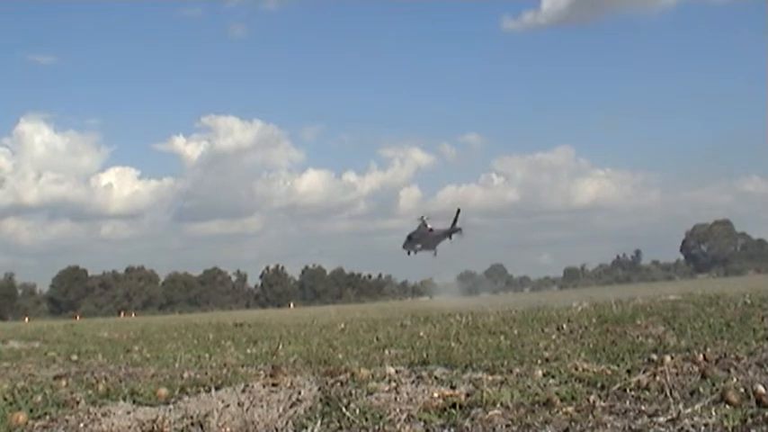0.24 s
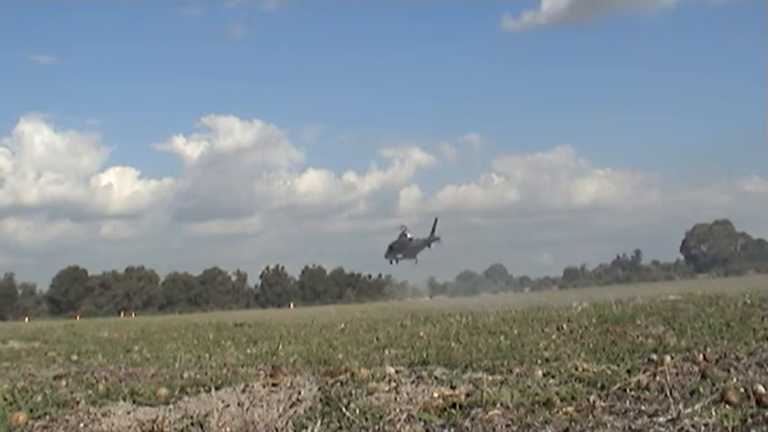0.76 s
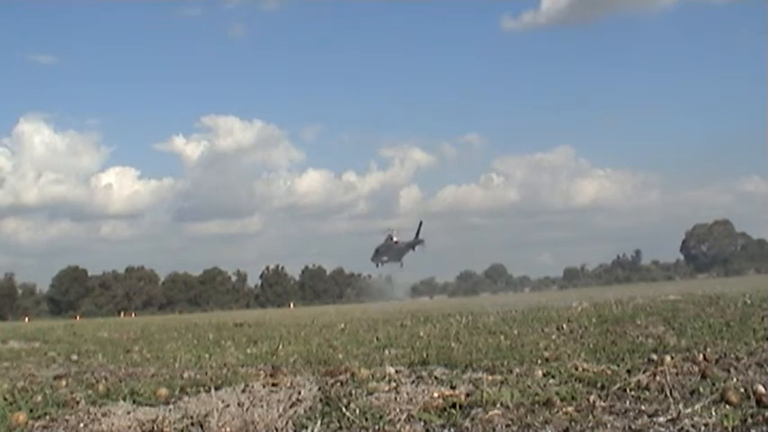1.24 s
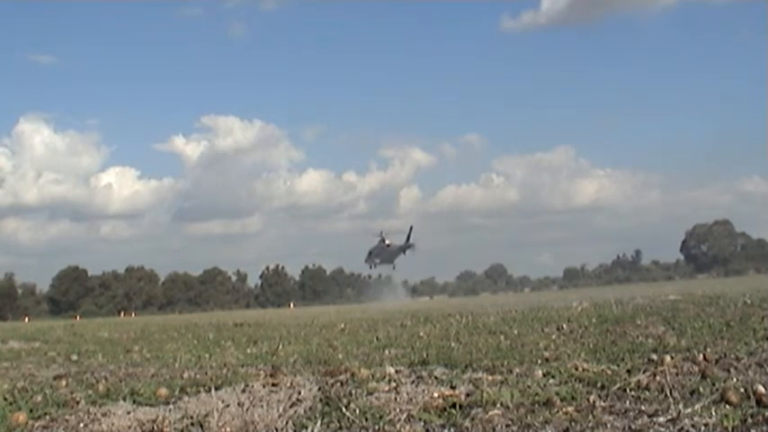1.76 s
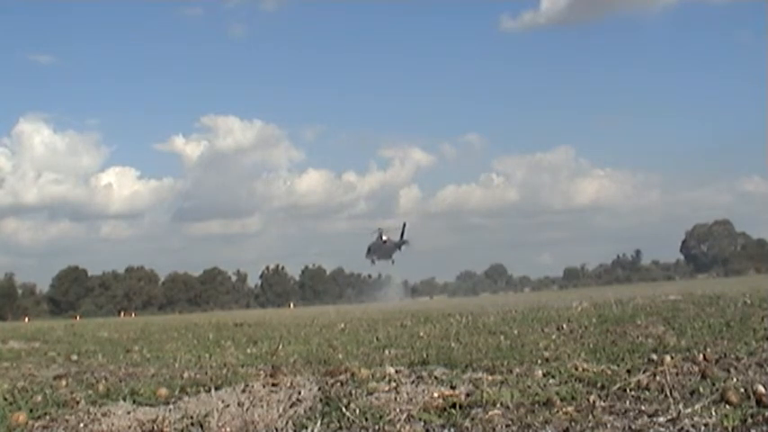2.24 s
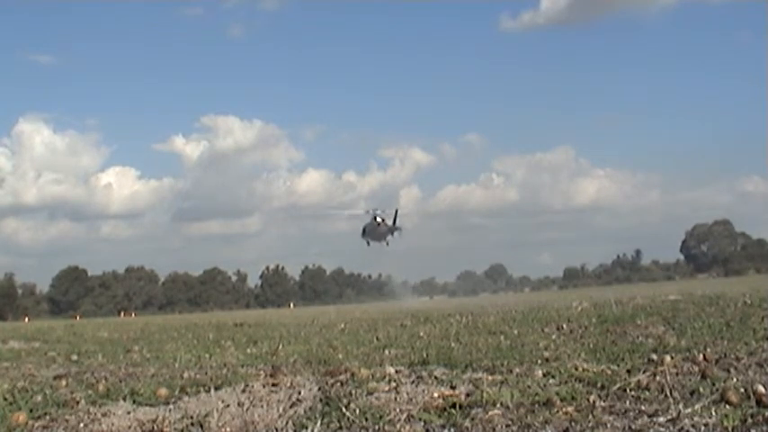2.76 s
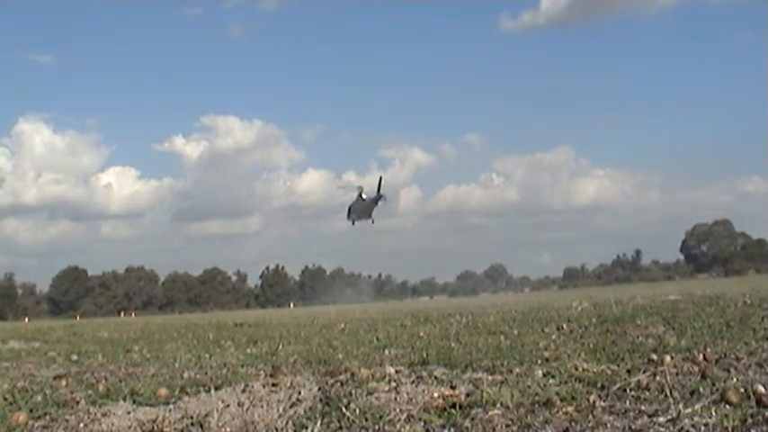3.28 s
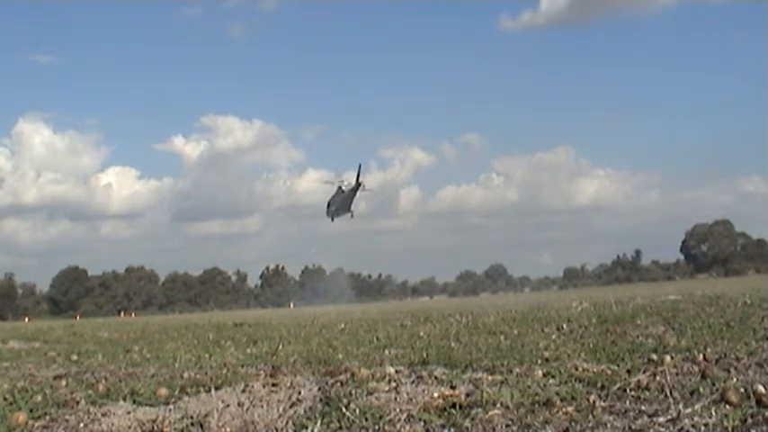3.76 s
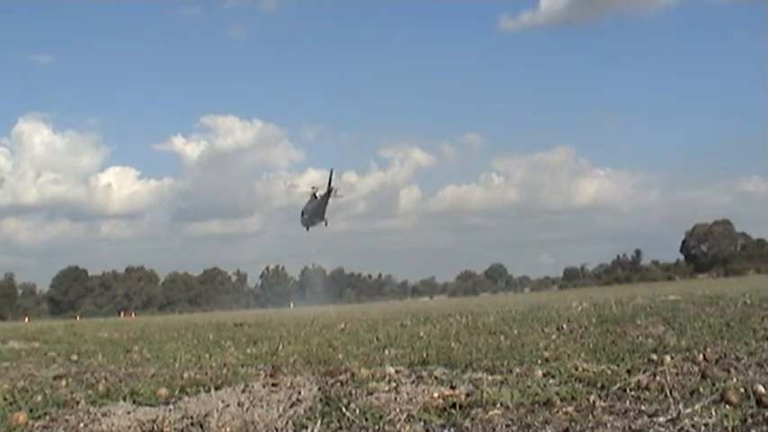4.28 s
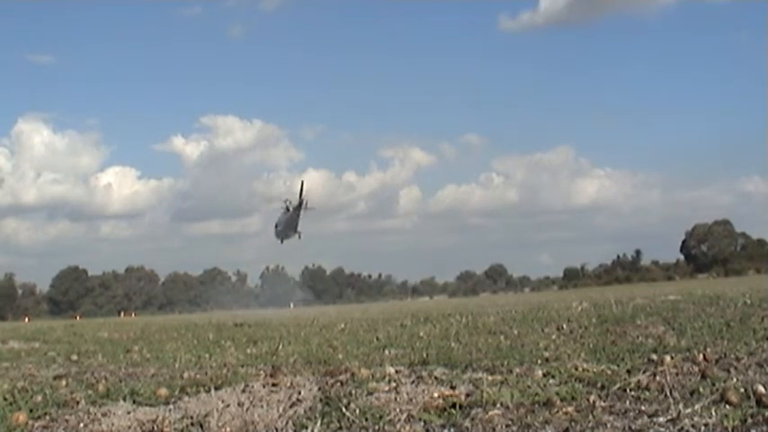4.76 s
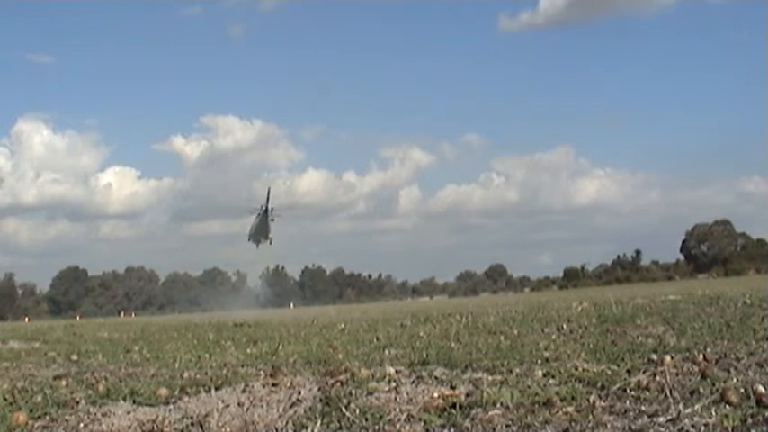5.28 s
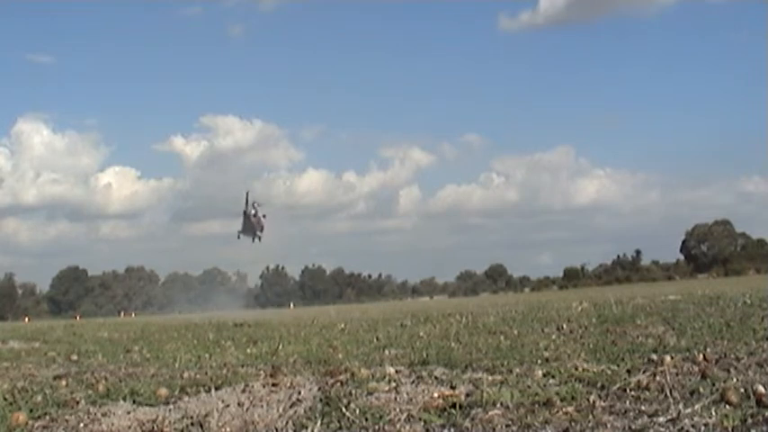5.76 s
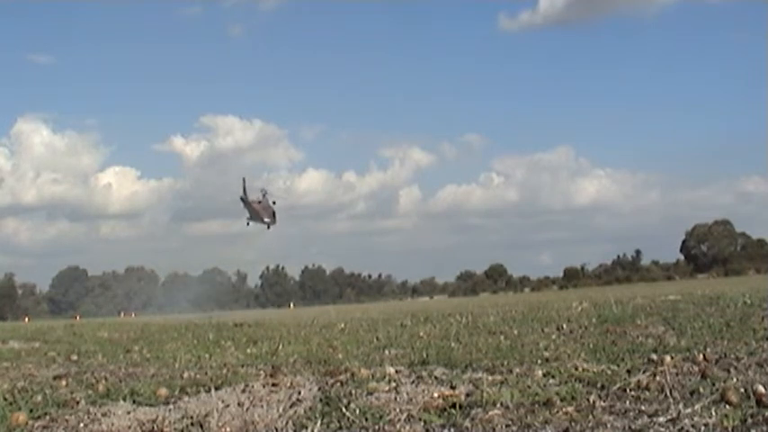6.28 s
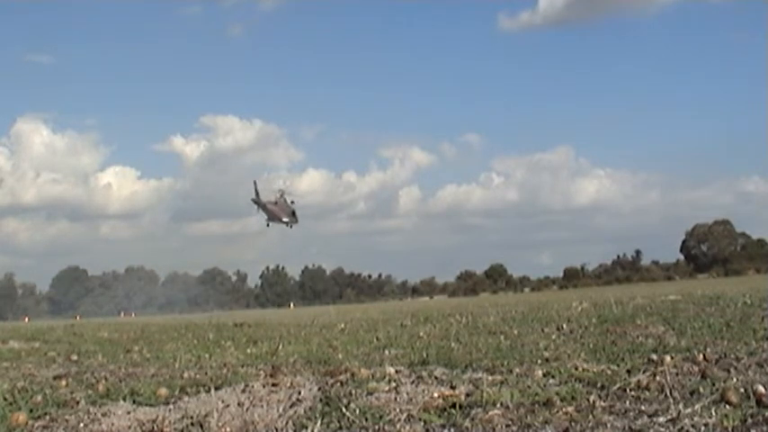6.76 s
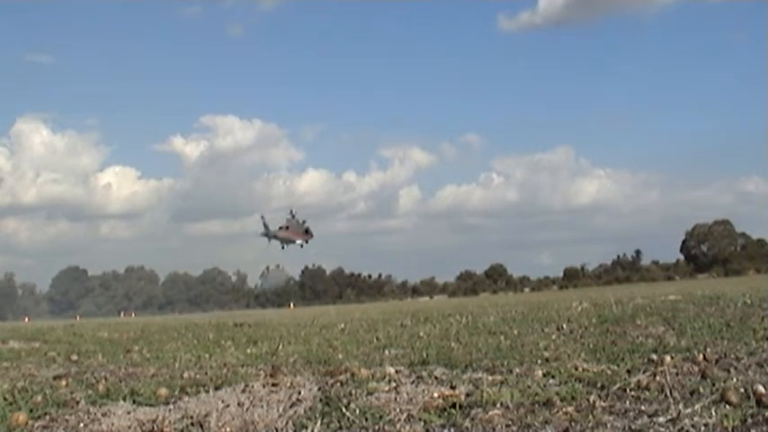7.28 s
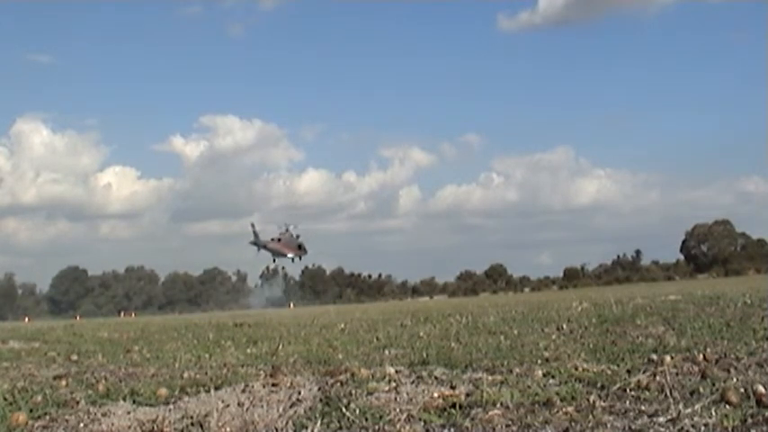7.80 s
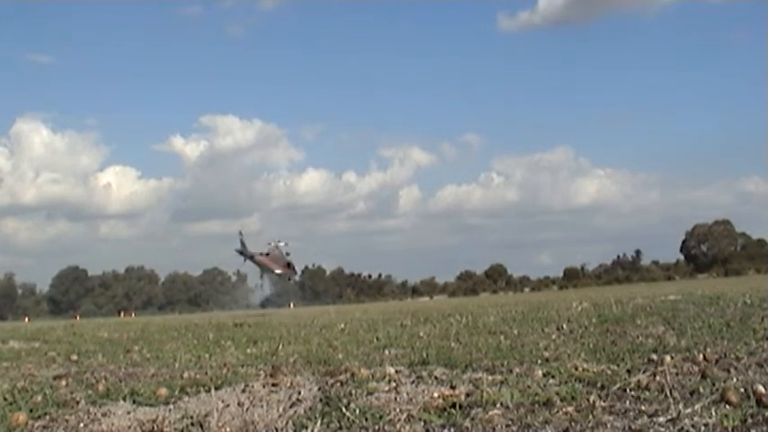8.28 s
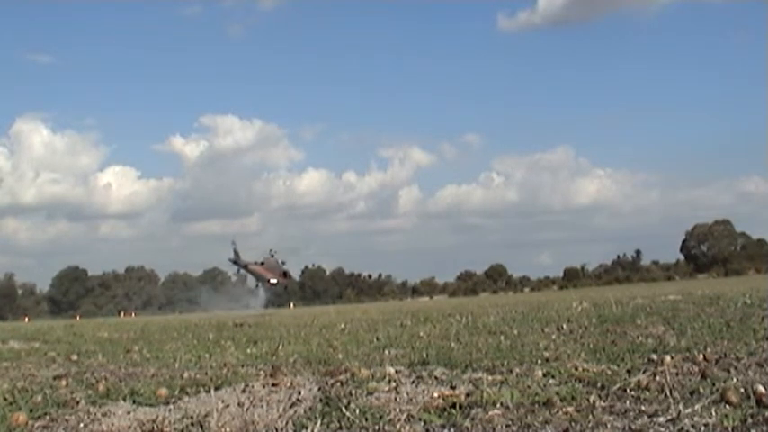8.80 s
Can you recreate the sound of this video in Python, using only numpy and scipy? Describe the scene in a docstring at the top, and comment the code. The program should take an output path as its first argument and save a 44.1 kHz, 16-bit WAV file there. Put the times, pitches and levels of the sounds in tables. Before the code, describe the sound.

Over an open field, a small model helicopter hovers with its two-stroke engine running continuously at almost constant pitch. A strong low-mid buzzing drone carries rotor flutter, airy wash, rasping exhaust, thin gear whine and rattle. The tone brightens and dulls as it climbs and turns. A stationary microphone at some distance outdoors also picks up soft low puffs of wind.

```python
"""Model helicopter over a field

A model helicopter hovers and slowly turns over an open field, its two-stroke engine at nearly constant speed.
One crankshaft drives the sines and pulses: exhaust, main and tail rotor, gear whine and rattle, blade slap.
Coloured noise pulsed at shaft rates makes the wash, rasp and a hiss once per rotor turn.
Height and heading set the balance: climbing brightens it, turning sweeps beams of sound past the microphone.
Slow noise underneath is a light breeze with a few puffs of wind."""
import sys
import numpy as np
from scipy.fft import rfft, irfft, next_fast_len
from scipy.io import wavfile
from scipy.ndimage import map_coordinates

SR = 44100
rng = np.random.default_rng(int(sys.argv[2]) if len(sys.argv) > 2 else 0)


def int16_out(signal):
    """Quantize to a 16-bit WAV file."""
    q = np.round(np.clip(np.atleast_2d(signal).T, -1, 1) * 32767)
    wavfile.write(sys.argv[1], SR, q.astype(np.int16))


N = 398659

# Flight and engine
# crankshaft speed, one firing per turn: (t/s, f/Hz)
FIRING_RATE = [(0, 247.6), (0.5, 246.4), (1, 247.6), (1.85, 248.4), (2.25, 247.9), (2.8, 248.9),
               (3.7, 250.3), (4.15, 249.4), (4.8, 249.2), (5.65, 246.8), (6.4, 246.4), (6.85, 248.8),
               (7.15, 249.2), (7.7, 248.2), (8.25, 248.5), (9.04, 247.0)]
# height above the grass: (t/s, height/m)
HEIGHT = [(0, 1.76), (.4, 0.96), (1.9, 0.88), (2.6, 0.88), (3.6, 1.78), (4.3, 1.85), (5.4, 1.47),
          (6.5, 1.4), (7.3, 1.19), (8.6, .65), (9.04, .6)]
# heading away from end-on, negative with the nose to the left: (t/s, angle/deg)
HEADING = [(0, -63), (2.2, -50), (3, -37.5), (4.2, -16.5), (5.48, 0.5), (6.3, 24), (7.2, 36), (9.04, 73)]
MAIN_GEAR, TAIL_GEAR = 11 / 93, 70 / 15  # main rotor turns per crank turn; tail turns per main turn
PINION_TEETH = 11
HOVER_M, END_ON_DEG = 1.236, 11.4  # reference height; how far the end-on change reaches

# Radiation patterns, one row per sound: (level/dB at the reference height, climb/dB per m, beam angle/deg,
# beam width/deg, nose-left beam/dB, nose-right beam/dB, end-on change/dB)
# engine orders 1, 2, 3, 4 and 6 of the exhaust
EXHAUST_BEAMS = [(-14.5, -2.5, 16, 8.4, -0.5, 1, 0.4), (-28.9, 0.5, 20.7, 27, -4, -1.2, -.7),
                 (-27, 2, 51, 17, -2.6, -1, -0.3), (-36, 6, 38, 18, 0.4, -3.8, -4),
                 (-41.5, 8.5, 47, 13.4, 6.5, 3.5, -5.5)]
# 15th and 16th engine order, the strongest tones of the buzz
SINGING_BEAMS = [(-59, 4, 48, 27, -2, 7, -2), (-56.5, 7, 41, 9.7, 11, 8, -2)]
# lower sideband, centre and upper sideband of the whine; levels add to WHINE_LEVEL
WHINE_BEAMS = [(-14, 0, 62, 45, 6, 14, 4), (-3, 0.33, 40.3, 7.7, -6, -6, 0.5),
               (-16, 2, 40.6, 14, 13, 13, 9)]
# exhaust note scattered by the blades, before the trims in chopped()
SCATTER_BEAM = (-49, 3.5, 16, 18, 8.5, -9, 5)
# turbulence of the blades, before a 5 dB lift
DOWNWASH_BEAM = (-37, 1, 21, 7, 0.2, 1, -0.3)

# Levels over time
# exhaust overtones that swell and fade: (t/s, fifth order level/dB, silencer ring level/dB)
OVERTONES = [(0.0, -44, -34.5), (0.43, -37.5, -39), (2.09, -39.5, -33.5), (2.29, -43, -36.5),
             (2.74, -31.5, -38), (3.2, -35.5, -31), (4.18, -41.5, -27), (5.49, -42, -31.5),
             (5.99, -34.5, -32.5), (6.39, -37, -41.5), (6.97, -37.5, -42), (7.15, -34.5, -56),
             (7.5, -37, -41), (8.03, -44.5, -54), (8.36, -42, -48), (8.41, -43, -57), (9.04, -44, -46)]
# low rotor tones: (t/s, main rotor level/dB, tail rotor level/dB)
THRUM = [(0, -43.5, -33), (1, -40, -30.5), (2.2, -39, -31), (3.5, -42.5, -34), (5, -44, -34),
         (6.5, -43, -38), (9, -42, -37.5)]
# tail rotor overtones, before a 1.6 dB cut: (t/s, level/dB)
TAIL_BUZZ = [(0, -44), (.3, -32.5), (1.2, -34.5), (2.8, -33), (3.4, -35), (3.9, -35.5), (4.7, -35),
             (6.4, -34.5), (6.95, -34), (7.4, -35.5), (7.8, -37), (8.6, -35.5), (9.04, -36)]
# blade slap: (t/s, level/dB)
SLAP_LEVEL = [(0, -51.5), (2.5, -50.5), (3.2, -42.5), (4.85, -52), (5.1, -39.5), (5.29, -40), (5.45, -57.5),
              (7.6, -45), (9, -50)]
# gear whine, before each tone's own pattern: (t/s, level/dB)
WHINE_LEVEL = [(0.0, -41), (0.53, -48), (1.18, -41), (2.26, -47), (2.44, -40.5), (4.3, -34.5), (4.38, -39),
               (4.51, -35), (5.66, -45.5), (5.84, -36.5), (6.07, -45), (6.8, -34), (7.0, -43),
               (7.17, -39.5), (7.43, -49), (7.78, -40), (8.63, -47), (9.04, -43.5)]
# tone at the pinion's tooth rate, before a 0.6 dB lift: (t/s, level/dB)
TOOTH_TONE = [(0.0, -50), (0.22, -52.5), (3.15, -50), (5.61, -59), (6.04, -49), (7.15, -63), (8.06, -55),
              (8.74, -59), (8.99, -57), (9.04, -50)]
# treble, of which only the swing about its mean is used: (t/s, level/dB)
TREBLE = [(0.0, -40.5), (0.35, -47.5), (1.33, -41.5), (2.09, -44.5), (3.3, -37), (4.38, -36.5), (4.51, -35),
          (5.01, -40.5), (5.79, -40.5), (5.84, -37.5), (6.62, -37), (7.1, -43), (7.28, -38.5),
          (7.45, -42.5), (7.6, -40), (8.33, -42), (8.53, -52.5), (9.04, -45)]
# puffs of wind, before the wind trim: (t/s, half length/s, level/dB)
GUSTS = [(0, .04, -48), (1.27, .04, -52), (2.74, .04, -50), (2.938, .05, -45), (3.1, .08, -52),
         (3.31, .05, -50), (4.26, .08, -53), (4.772, .04, -55), (6.91, .09, -40.5), (7.207, .04, -50),
         (7.355, 0.072, -48), (7.612, .04, -42), (7.866, .04, -52)]

# Overtones
# thin upper exhaust overtones, at the mean rasp level: (engine order, level/dB)
BUZZ = [(8, -53.5), (9, -58.5), (10, -59), (12, -62.5), (13, -57), (14, -58.5), (17, -62), (19, -64),
        (20, -59)]
# main rotor, relative to its thrum: (blade-pass order, level/dB)
MAIN_BLADES = [(1, -2), (2, 0.42), (3, -6.5), (4, -12)]
# tail rotor, relative to its buzz: (blade-pass order, level/dB)
TAIL_BLADES = [(2, 0.5), (3, -5), (4, -9.5), (5, -14), (6, -19)]
# gear rattle, relative to each other: (engine order, level/dB)
RATTLE_LINES = [(30, -6), (31, -2.5), (33, 1.5), (35, 0), (36, -18), (37, -2.5), (43, -19)]

# Noise colours, relative levels: (f/Hz, level/dB)
# air churned by the rotors
WASH_COLOUR = [(40, -26), (80, -11), (150, -7.5), (270, -4.5), (380, 0), (560, 2), (800, -1.5),
               (1100, -7.5), (1600, -8.5), (2100, -15.5), (3500, -33)]
# gas rushing from the port
RASP_COLOUR = [(900, -27), (2000, -2), (2600, -1), (3800, 0.5), (5000, -1.5), (6500, -5.5), (8000, -8.5),
               (10500, -8), (12000, -16), (16000, -16)]
# gear teeth knocking
CLATTER_COLOUR = [(5500, -34.5), (7000, -7.5), (8200, 1), (8600, -7), (9200, 1), (9900, -7.5), (10800, -1),
                  (12000, -15), (16000, -19)]
# spitting hiss of the rotor head
HEAD_COLOUR = [(6000, -35), (10500, -12), (12200, -6), (13500, -1.5), (14800, 4), (16000, -6)]
# rumble of wind on the microphone
WIND_COLOUR = [(10, -8.5), (25, -8), (60, 5), (110, -6.5), (200, -8), (500, -39)]
# gas noise in the silencer, scuff around the whine, crack of the blades
GAS_COLOUR = [(1200, -31.5), (1600, -2), (1750, 1), (1850, -5), (2100, -38)]
SCUFF_COLOUR = [(4700, -50), (5250, -16), (5480, -2), (5700, -13), (6200, -49)]
CRACK_COLOUR = [(600, -18), (1400, 1.5), (2700, -0.5), (4500, -8.5), (9000, -16), (14000, -40)]
# filter on the scattered exhaust: (f/Hz, level/dB)
SCATTER_RESPONSE = [(190, -27), (300, 0.0), (380, 3.0), (600, -10), (1800, -45.0)]

# noises that follow the treble: (level/dB, follow/dB per dB of treble swing, end-on change/dB)
RASP_LEVEL = (-40.07, 0.34, -3.1)
RATTLE_LEVEL = (-44, 1.22, -1.7)
HEAD_LEVEL = (-45.5, 0.76, 2.6)
RASP_WITH_WHINE = 0.15  # dB per dB: the rasp shares the lulls of the whine
SCATTER_SPREAD = 0.4  # dB in the outer sidebands per dB of scatter
BREEZE_DB, BREEZE_SWING_DB, WIND_TRIM_DB = -59, 3, 8  # the trim lifts breeze and puffs together

# Microphone
# side signal as a share of mid in every noise: (f/Hz, gain ratio)
PORT_SPREAD = [(30, 0.41), (80, 0.48), (200, 0.017), (5000, 0.0017), (7300, .01), (8200, 0.1),
               (16000, 0.17)]
# the two ports: (f/Hz, left minus right level/dB, left lead/rad)
PORT_LEAN = [(60, -.7, 0.17), (250, -0.5, 0.16), (500, 1, 0.209), (1010, 1.68, -0.044), (1620, 1.5, -0.098),
             (1985, 0, 0)]
TOP_HZ = 15950  # band limit


def amp(db):
    """Decibels to gain."""
    return 10 ** (np.asarray(db) / 20)


def unit(x):
    """Scale to rms 1."""
    return x / np.sqrt(np.mean(x ** 2) + 1e-20)


def along(points, hz):
    """Read (f/Hz, value) points on a log frequency axis."""
    f, v = np.transpose(points)
    return np.interp(np.log(hz + 1), np.log(f + 1), v)


def curves(rows):
    """One value per sample for each column after the time."""
    s, *cols = np.transpose(rows)
    t = np.arange(N) / SR
    return [np.interp(t, s, col) for col in cols]


def wobble(rate):
    """A smooth random curve with rate knots a second."""
    knots = rng.standard_normal(int(N * rate / SR) + 4)
    return map_coordinates(knots, [np.arange(N) * rate / SR])


def filtered(x, response):
    """Shape the spectrum of x by a response of frequency."""
    m = next_fast_len(N + 8192)
    hz = np.fft.rfftfreq(m, 1 / SR)
    return irfft(rfft(x, m) * response(hz), m)[..., :N]


def noise(colour):
    """Coloured stereo noise of rms 1, nearly alike at both ports except at the bottom and the top."""
    def mid_side(hz):
        return amp(along(colour, hz)) * np.array([np.ones_like(hz), along(PORT_SPREAD, hz)])

    mid, side = filtered(rng.standard_normal((2, N)), mid_side)
    return unit(np.array([mid + side, mid - side]))


def tone(turns):
    """A sinusoid of rms 1 that peaks at every whole turn."""
    return np.sqrt(2) * np.cos(2 * np.pi * turns)


def stack(turns, orders):
    """Sum of tones at whole multiples of a shaft's rate."""
    return sum(amp(db) * tone(round(k) * turns) for k, db in orders)


def bursts(turns, sharpness):
    """A bump of height 1 at every whole turn."""
    return np.exp(sharpness * (np.cos(2 * np.pi * turns) - 1))


def lobe(at, centre, width):
    """A bell of height 1."""
    return np.exp(-((at - centre) / width) ** 2)


def radiated(pattern):
    """Level in dB of one sound over the flight; its beam has a twin on the other flank."""
    db, climb_db, angle, width, left_db, right_db, end_db = pattern
    height, = curves(HEIGHT)
    heading, = curves(HEADING)
    beams = left_db * lobe(heading, -angle, width) + right_db * lobe(heading, angle, width)
    return db + climb_db * (height - HOVER_M) + beams + end_db * lobe(heading, 0, END_ON_DEG)


def with_treble(rule):
    """Level in dB of a noise that follows the treble and changes when the body is end-on."""
    db, follow, end_db = rule
    treble_db, = curves(TREBLE)
    heading, = curves(HEADING)
    return db + follow * (treble_db - treble_db.mean()) + end_db * lobe(heading, 0, END_ON_DEG)


def wind():
    """A light breeze and a few puffs rumble on the microphone."""
    t = np.arange(N) / SR
    puffs = sum(amp(db) * lobe(t, s, length) for s, length, db in GUSTS)
    breeze = amp(BREEZE_DB + BREEZE_SWING_DB * wobble(8))
    return amp(WIND_TRIM_DB) * (breeze + puffs) * noise(WIND_COLOUR)


def rotor_head(rotor):
    """A high, spitting hiss comes round once per rotor turn."""
    swell = bursts(rotor + 0.008 * wobble(6), sharpness=4.6) * amp(0.7 * wobble(30))
    spit = amp(1.7 * wobble(900))
    return amp(with_treble(HEAD_LEVEL)) * unit(noise(HEAD_COLOUR) * (0.32 + swell) * spit)


def rotors(rotor):
    """Two-bladed main and tail rotors thrum; their turbulent wash pulses with the main blades."""
    main_db, hum_db = curves(THRUM)
    tail_db, = curves(TAIL_BUZZ)
    main = amp(main_db) * stack(2 * rotor, MAIN_BLADES) * amp(0.39 * wobble(7.4))
    # the tail rotor works in the main rotor's wake, so its overtones flutter
    tail_pass = 2 * TAIL_GEAR * rotor
    flutter = stack(tail_pass + 0.036 * wobble(45), TAIL_BLADES) * amp(1.7 * wobble(25))
    tail = amp(hum_db) * tone(tail_pass) + amp(tail_db - 1.6 + 1.3 * wobble(7)) * flutter
    pulse = (1 + 0.5 * bursts(2 * rotor, sharpness=0.43)) * amp(0.85 * wobble(18))
    wash = amp(radiated(DOWNWASH_BEAM) + 5) * unit(noise(WASH_COLOUR) * pulse)
    return main + tail + wash


def slap(rotor):
    """Each main blade cracks as it cuts a tip vortex, some harder than others."""
    slap_db, = curves(SLAP_LEVEL)
    cracks = bursts(2 * rotor, sharpness=17) * amp(0.8 * wobble(60))
    return amp(slap_db) * unit(cracks * noise(CRACK_COLOUR))


def whine(crank, rotor):
    """The pinion whines at twice its tooth rate; the main gear warbles it once and four times a turn."""
    whine_db, = curves(WHINE_LEVEL)
    lower, centre, upper = [amp(whine_db + radiated(row) + 1.42 * wobble(3.7)) for row in WHINE_BEAMS]
    mesh = 2 * PINION_TEETH * crank + 0.093 * wobble(120)
    fourfold = 4 * rotor
    tones = centre * tone(mesh)
    tones = tones + lower * tone(mesh - fourfold + rng.random())
    tones = tones + upper * tone(mesh + fourfold + rng.random())
    warble = amp(-13.5) * centre * tone(mesh - rotor + rng.random())
    # a narrow scuff of noise follows the summed power of the three tones
    strength = np.sqrt(lower ** 2 + centre ** 2 + upper ** 2)
    scuff = amp(-5.5) * strength * noise(SCUFF_COLOUR)
    return (tones + warble) * amp(0.82 * wobble(150)) + scuff


def rattle(crank):
    """Every firing knocks the gear teeth across their play and back; the knocks come in uneven clumps."""
    lines = 0
    for k, db in RATTLE_LINES:
        turns = round(k) * crank + rng.random() + 0.087 * wobble(130)
        lines = lines + amp(db + 2.8 * wobble(4)) * tone(turns)
    knocks = 0.63 + bursts(crank, sharpness=8) + 0.7 * bursts(crank - 0.27, sharpness=4)
    clatter = unit(noise(CLATTER_COLOUR) * knocks)
    clumps = amp(0.82 * wobble(22) + 1.3 * wobble(150))
    return amp(with_treble(RATTLE_LEVEL)) * clumps * (amp(-2.0) * clatter + amp(-5.0) * unit(lines))


def rasp(crank, rotor):
    """Port gas rushes twice per crank turn under a thin buzz; the tooth tone pulses once per rotor turn."""
    whine_db, = curves(WHINE_LEVEL)
    tooth_db, = curves(TOOTH_TONE)
    rasp_db = with_treble(RASP_LEVEL) + RASP_WITH_WHINE * (whine_db - whine_db.mean())
    gate = 1 + 0.55 * bursts(2 * crank, sharpness=2.8)
    gate = gate * (1 + 0.13 * bursts(2 * rotor, sharpness=2.7))
    gas = amp(rasp_db) * unit(noise(RASP_COLOUR) * gate)
    buzz = 0
    for k, db in BUZZ:
        turns = round(k) * crank + rng.random() + 0.064 * wobble(90)
        buzz = buzz + amp(db + 2 * wobble(3.14)) * tone(turns)
    buzz = buzz * amp(rasp_db - rasp_db.mean())
    singing = 0
    for k, row in zip((15, 16), SINGING_BEAMS):
        singing = singing + amp(radiated(row) + 1.8 * wobble(12)) * tone(k * crank + 0.05 * wobble(90))
    tooth = amp(tooth_db + 0.6 + 2.7 * wobble(14)) * tone(PINION_TEETH * crank + 0.048 * wobble(90))
    return gas + buzz + singing + tooth * (1 + 0.27 * tone(rotor))


def chopped(pipe, rotor):
    """Passing blades and the shaking tail boom scatter the exhaust note into sidebands."""
    scatter_db = radiated(SCATTER_BEAM)
    outer = amp(SCATTER_SPREAD * (scatter_db - scatter_db.mean()))
    blades = amp(scatter_db + 18.0) * tone(2 * rotor)
    blades = blades + outer * stack(2 * rotor, [(2, -28), (3, -41), (4, -66)])
    boom = outer * amp(-27.0 + 1.4 * wobble(14)) * tone(TAIL_GEAR * rotor)
    sweep = blades + boom + amp(-31.5) * tone(rotor)
    # long waves bend round the blades unscattered
    return filtered(pipe * sweep, lambda hz: amp(along(SCATTER_RESPONSE, hz)))


def exhaust(crank):
    """One pressure pulse per firing, built from engine orders that waver in strength and timing."""
    fifth_db, ring_db = curves(OVERTONES)
    firing = crank + 0.0033 * wobble(120)
    note = amp(fifth_db) * tone(5 * firing)
    for k, row in zip((1, 2, 3, 4, 6), EXHAUST_BEAMS):
        note = note + amp(radiated(row)) * tone(k * firing)
    # the silencer rings near the seventh order, faintly at the ninth, and gas noise rings with it
    gas = noise(GAS_COLOUR)[0]
    ring = tone(7 * firing) + amp(-22.5) * tone(9 * firing) + amp(-13.5) * gas
    return (note + amp(ring_db) * ring) * amp(0.11 * wobble(200))


def scene():
    """All moving parts turn with the crankshaft; the wind blows on its own."""
    firing_hz, = curves(FIRING_RATE)
    crank = np.cumsum(firing_hz) / SR  # turns
    rotor = MAIN_GEAR * crank
    air = wind() + rotor_head(rotor) + rotors(rotor) + slap(rotor)
    gears = whine(crank, rotor) + rattle(crank)
    pipe = exhaust(crank)
    engine = pipe + chopped(pipe, rotor) + rasp(crank, rotor)
    return air + gears + engine


def record(dry):
    """The two microphone ports differ slightly in level and phase; nothing passes above the band limit."""
    at_hz, lean_db, lead = np.transpose(PORT_LEAN)
    sides = np.array([[0.5], [-0.5]])  # each port takes half the difference

    def ports(hz):
        level = amp(sides * np.interp(hz, at_hz, lean_db))
        phase = np.exp(1j * sides * np.interp(hz, at_hz, lead))
        return level * phase * (hz < TOP_HZ)

    return filtered(dry, ports)


dry = scene()
out = record(dry)
int16_out(out)
```